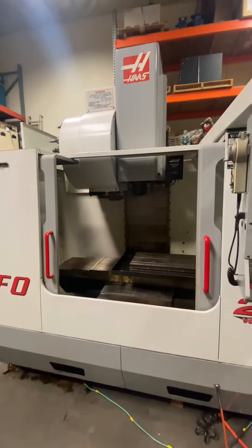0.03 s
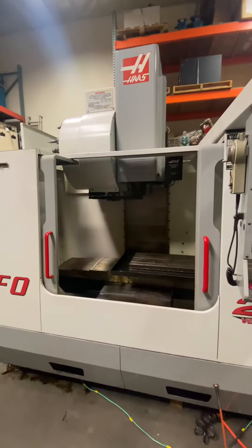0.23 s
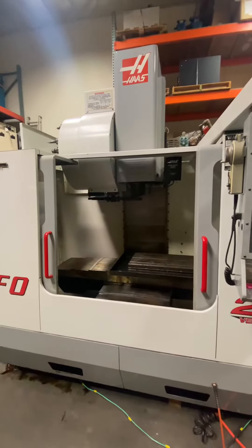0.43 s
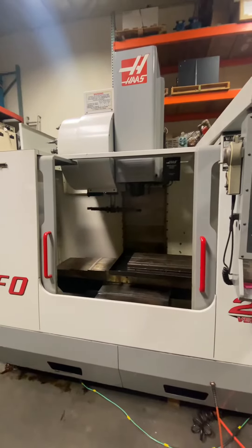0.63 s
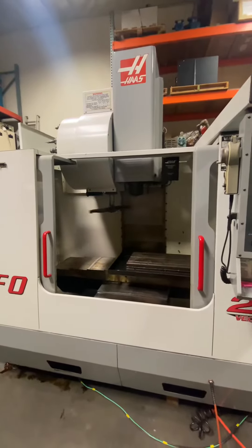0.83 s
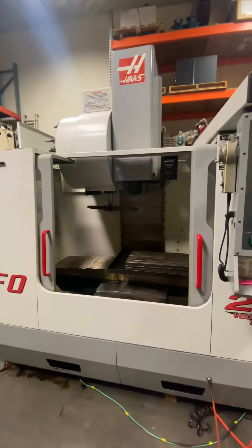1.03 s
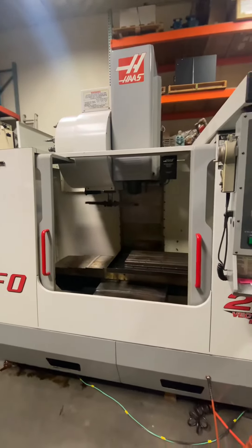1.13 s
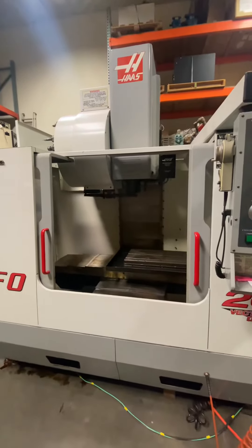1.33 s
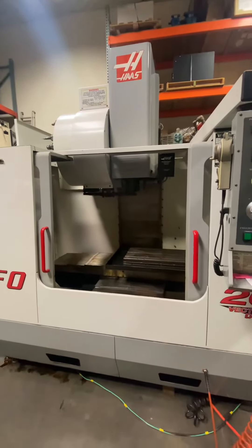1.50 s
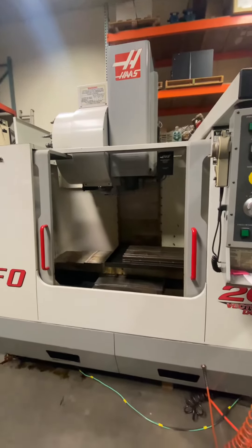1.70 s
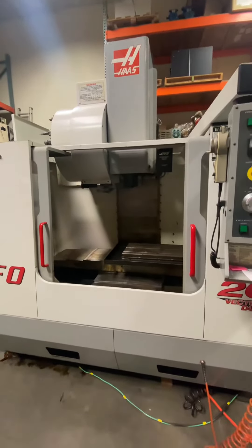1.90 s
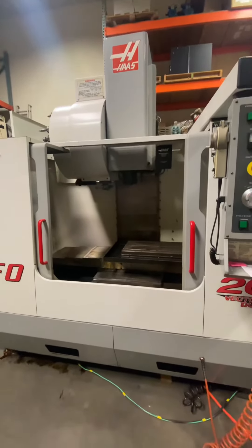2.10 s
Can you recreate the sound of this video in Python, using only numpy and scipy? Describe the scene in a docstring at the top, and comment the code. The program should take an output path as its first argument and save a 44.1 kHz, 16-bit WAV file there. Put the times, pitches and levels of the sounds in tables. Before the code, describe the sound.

Machine tool change: a thud, a second of hissing air, then another thud over low hum.

```python
"""A machine changes its tool

A machining centre in a warehouse is heard a few metres off through the open door. The drawbar, the rod
that grips the tool, lets go with a deep thud in the sheet-metal enclosure. A blast of air cleans the
tool's socket, the drawbar clamps with a duller thud, and the changer arm bumps and clacks home.
Motor tones and a hum lie underneath, and a soft hiss rises at the end."""
import sys
import numpy as np
from scipy import signal
from scipy.fft import rfft, irfft, next_fast_len
from scipy.io import wavfile
from scipy.ndimage import uniform_filter1d, map_coordinates

SR = 44100
rng = np.random.default_rng(int(sys.argv[2]) if len(sys.argv) > 2 else 0)


def file_out(sig):
    """Save sig as 16-bit WAV at sys.argv[1]."""
    # one column per channel
    cols = np.atleast_2d(sig).T
    # limit, then scale
    lim = np.clip(cols, -1, 1)
    pcm = np.round(lim * 32767).astype(np.int16)
    wavfile.write(sys.argv[1], SR, pcm)


N = 94815

# "Mid" is the sound that left and right share, and "side" is how they differ.
# A ring time is how long a sound takes to fade by 60 dB.
# How loud the air blast is. Each row: time in seconds, level in dB.
BLAST_LEVEL = [(.298, -68), (.312, -32), (.34, -27.5), (.39, -28), (.45, -23), (.56, -23), (.655, -24.5),
               (.83, -23), (1.05, -25.5), (1.25, -25.5), (1.36, -27), (1.405, -27.5), (1.44, -41),
               (1.5, -66.5), (1.6, -97)]
# The blast's tone as heard, mid and side, with deep gaps near 5 kHz and, in the mid, near 9 kHz.
# Each row: frequency in Hz, relative level in dB.
BLAST_HEARD_MID = [(500, -22.5), (900, -22), (1100, -4.5), (1500, -12.5), (2000, -9.5), (2350, -6.5),
                   (2500, -9), (2800, -4), (3000, -7.5), (3350, -2.5), (3530, -5), (3680, -0.5), (4000, -6),
                   (4250, -12.5), (4600, -18.5), (5000, -48), (5600, -19), (6200, -13), (8100, -14),
                   (8700, -76), (10000, -53), (13000, -31.5), (14500, -11.5), (15600, -40.5)]
BLAST_HEARD_SIDE = [(500, -44.5), (850, -31), (1060, -7), (1450, -22.5), (1970, -28), (2450, -5.5),
                    (3800, -12), (4500, -13.5), (5430, -48), (6100, -18), (8000, -15), (10300, -15),
                    (10800, -8.5), (11700, -18), (13700, -34.5), (15000, -20.5), (15600, -28.5)]
# Narrow resonances of the enclosure, which shift as the tool leaves.
# Each row: frequency in Hz, width in Hz, early boost in dB, late boost in dB.
RESONANCES = [(2116, 26, 6, 11.5), (2205, 24, 2.5, 6), (2330, 42, 13.5, 7), (2392, 30, 10.5, 9.5),
              (2563, 23, 10, 8.5), (2646, 18, -1.5, 11), (2751, 25, 3.5, 11.5), (2849, 60, 8.5, 9.5),
              (3246, 32, 4, 12), (3378, 59, 12, 10.5), (3615, 30, 5, 14), (3690, 30, 13, 4.5),
              (3736, 44, 7.5, 6), (4060, 30, 7.5, 8), (4280, 16, 6, 10.5), (4500, 24, 8, 8)]
# How long the hall echoes the jet. Each row: frequency in Hz, ring time in seconds.
ECHO_RING_TIMES = [(800, 0.88), (3000, 1.06), (6000, 1.05), (12000, 0.63)]
# The tone of that echo. Each row: frequency in Hz, gain in dB.
ECHO_TONE = [(900, -1), (2000, 1), (3700, -3.5), (5000, 3), (7000, -3), (12000, -5.5)]
# Drawbar thuds and arm bumps. Each row: start in seconds, gain in dB, favoured frequency in Hz,
# drop away from it in dB per octave squared (sign ignored), a factor on the ring times.
BLOWS = [(0.204, -15, 916, -2.5, 0.27), (.208, -10, 400, 0.5, 0.92), (0.386, -11, 77, 12, 0.29),
         (0.644, -27, 80, 1, 0.49), (.72, -30, 84, -0.5, 0.28), (1.091, -23, 150, 29, 0.35),
         (1.378, -11.5, 186, 13.5, 0.22), (1.403, -6, 272, 63, 0.28), (1.452, -22.5, 111, 8, 1),
         (1.53, -11.5, 79, 11.5, 0.16), (1.57, -24.5, 108.5, 2.5, 0.42), (1.66, -24.5, 81, 10.5, 0.38),
         (1.727, -27.5, 80, 5, 0.36), (1.869, -26.5, 96, 3.5, 0.39), (2.06, -26.5, 83.4, 10.5, 0.28)]
# The notes of the cast frame and the sheet metal.
# Each row: frequency in Hz, relative level in dB, ring time in seconds before a blow's factor.
BODY_NOTES = [(73.9, -2.5, 3.26), (117.8, 6.5, 0.51), (148.6, 3.5, 0.87), (194.3, -6.5, 1.28),
              (286.3, -6.5, 0.73), (307.2, -9.5, .6), (355.4, -7, 0.77), (387, -0.5, 0.91),
              (426, 0.5, 0.98), (486, -11, 0.44), (619, -10.5, .6), (674, -8, .3), (805, -16.5, 0.37),
              (1069, -10, 1.25), (1134, -6, 0.14), (1254, -19.5, .5), (1570, -15.5, 0.18), (1716, -2, 0.16),
              (1780, -4, 0.23)]
# The tone of the rattling panels. Each row: frequency in Hz, relative level in dB.
RATTLE_TONE = [(40, -32), (120, -5), (170, -10.5), (240, -23.5), (400, -7.5), (620, -20.5), (900, -33),
               (1090, -14), (1400, -29.5), (1780, -18.5), (2200, -39.5), (8000, -60.5), (15000, -60.5)]
# How long they rattle. Each row: frequency in Hz, ring time in seconds before a blow's factor.
RATTLE_RING_TIMES = [(70, 1.6), (400, 1.19), (2000, 1.25), (10000, 0.93)]
# The tone of the arm's clack. Each row: frequency in Hz, relative level in dB.
CLACK_TONE = [(700, -26.5), (1000, -9), (1350, -1), (1700, -6.5), (2300, -1), (2600, -6), (2950, 1.5),
              (3300, -6), (3600, -17.5), (6000, -15), (9000, -46), (15000, -44)]
# How wide the knocks and motors sound. Each row: frequency in Hz, gain of the side in dB.
STEREO_WIDTH = [(60, -43), (110, -49.5), (200, -35.5), (380, -6.5), (700, -6), (1200, 2), (1800, -8),
                (2700, 5.5), (4200, 3.5), (8000, -10), (10000, 23), (15000, 16)]
# Motor tones. Each row: start and end in seconds, first and last pitch in Hz, level in dB.
MOTOR_RUNS = [(-.2, .24, 324, 322, -37), (.45, .66, 730, 762, -41), (.85, 1.03, 757, 757, -36),
              (1.05, 1.36, 302, 302, -48), (1.62, 1.97, 735, 800, -50)]
# The hum as heard, mid and side. Each row: frequency in Hz, relative level in dB.
HUM_HEARD_MID = [(18, -60.5), (30, 5.5), (150, -3.5), (264, -11), (319, -6.5), (403, -19), (764, -11.5),
                 (1090, -26.5), (1630, -27.5), (8500, -43.5), (11000, -140), (18700, -120)]
HUM_HEARD_SIDE = [(59, -89.5), (100, -59.5), (196, -21.5), (780, -5.5), (1140, -22), (4640, -24),
                  (5040, -24), (8340, -32), (15000, -59.5)]
# How the hum and the closing hiss swell. Each row: time in seconds, relative level in dB.
HUM_LEVEL = [(0.0, -38.5), (0.18, -33.5), (0.3, -37), (1.21, -44), (2.15, -43.5)]
HISS_LEVEL = [(1.86, -81), (1.92, -49.5), (2.15, -42.5)]
# The hiss as heard, mid and side, with the mid nearly silent from 8 to 12 kHz.
# Each row: frequency in Hz, relative level in dB.
HISS_HEARD_MID = [(900, -16.5), (1500, -3.5), (3000, -2), (5900, -7), (7600, -10), (8400, -59),
                  (11900, -44.5), (13700, -10.5), (15500, -41.5)]
HISS_HEARD_SIDE = [(900, -31), (1500, -8), (3100, 0.5), (4600, -3), (9900, -12.5), (14300, -14),
                   (15500, -61)]
# The stereo balance. Each row: frequency in Hz, gain of left over right in dB.
BALANCE = [(60, -0.5), (150, 0.77), (250, 2.5), (700, 0.2), (1300, -1), (4000, -1.95), (9000, 0)]
# An even tone. Its one row: frequency in Hz, level in dB.
FLAT = [(1, 0)]


def air_blast():
    """A jet of swirling air stirs the enclosure's resonances and echoes round the hall."""
    shift_middle_s, shift_length_s = .69, .3
    side_lead_radians, echo_db, echo_boost_share = 1.78, -5, .85
    jet = rushing_noise(FLAT, FLAT, side_db=0, patchy_db=1.5)[0]
    flutter_db = .6 * wobble(6.86)
    jet *= amp(level_curve(BLAST_LEVEL) + flutter_db)
    tail = fading_noise(FLAT, lambda hz: look_up(ECHO_RING_TIMES, hz))
    tail = np.pad(tail / np.linalg.norm(tail[0]), ((0, 0), (SR // 50, 0)))  # arrives 20 ms later
    late = np.clip((np.arange(N) / SR - shift_middle_s) / shift_length_s + .5, 0, 1)
    lead = [1, np.exp(1j * side_lead_radians)]
    echo_gain = lambda hz: amp(echo_db + look_up(ECHO_TONE, hz))
    air = np.zeros((2, N))
    for stage, share in enumerate([1 - late, late]):  # the early boosts fade into the late ones
        air += filtered(share * jet, lambda hz: np.outer(lead, enclosure_boost(hz, stage)))
        echo = signal.fftconvolve(share * jet[None], tail, axes=1)[:, :N]
        air += filtered(echo, lambda hz: echo_gain(hz) * enclosure_boost(hz, stage) ** echo_boost_share)
    heard = lambda hz: amp([look_up(BLAST_HEARD_MID, hz), look_up(BLAST_HEARD_SIDE, hz)])
    mid, side = filtered(air, heard)
    return np.std(jet) * np.array([normalised(mid), amp(3.5) * normalised(side)])


def enclosure_boost(hz, stage):
    """The enclosure strengthens sound near its resonances; stage 0 is early and 1 is late."""
    return amp(sum(boosts_db[stage] / (1 + (2 * (hz - centre_hz) / width_hz) ** 2)
                   for centre_hz, width_hz, *boosts_db in RESONANCES))


def thuds():
    """Each blow of the drawbar or arm rings the machine's body and rattles its panels."""
    rise_s, rattle_db = .003, -9
    out, t = np.zeros((2, N + SR)), np.arange(SR) / SR
    for start_s, gain_db, favoured_hz, drop_db, ring_factor in BLOWS:
        tone_db = lambda hz: -abs(drop_db) * np.log2((hz + 1) / favoured_hz) ** 2
        ring = np.zeros((2, SR))
        for note_hz, note_db, ring_s in BODY_NOTES:
            phase = wandering_phase(t)
            start_db = note_db + tone_db(note_hz) + rng.normal(0, 1)
            fade_db = 60 * t / (ring_s * ring_factor)
            ring += amp(start_db - fade_db) * np.sin(2 * np.pi * note_hz * t + phase)
        rattle = fading_noise(RATTLE_TONE, lambda hz: ring_factor * look_up(RATTLE_RING_TIMES, hz))
        rattle = filtered(rattle, lambda hz: amp(rattle_db + tone_db(hz)))[:, :SR]
        rise = 1 - np.exp(-t / rise_s)
        out[:, round(start_s * SR):][:, :SR] += amp(gain_db) * (ring / 2 + rattle) * rise
    return spread(out[:, :N])


def arm_clack():
    """The arm lands home with a bright knock that dies away in the hall."""
    start_s, level_db, rise_s, ring_s = 1.887, -34.5, .0007, .39
    out, t = np.zeros((2, N + SR)), np.arange(SR) / SR
    knock = fading_noise(CLACK_TONE, lambda hz: np.full_like(hz, ring_s))
    rise = 1 - np.exp(-t / rise_s)
    out[:, round(start_s * SR):][:, :SR] = amp(level_db) * knock * rise
    return spread(out[:, :N])


def motors():
    """The motors sing slightly unsteady tones that swell and fade."""
    waver_hz, waver_db = 3, 1.5
    out, t = np.zeros((2, N)), np.arange(N) / SR
    for start_s, end_s, first_hz, last_hz, level_db in MOTOR_RUNS:
        progress = np.clip((t - start_s) / (end_s - start_s), 0, 1)
        pitch_hz = first_hz + (last_hz - first_hz) * progress + waver_hz * wobble(17)
        phase = 2 * np.pi * np.cumsum(pitch_hz) / SR
        swell = np.clip(2 * np.sin(np.pi * progress), 0, 1)
        peak = np.sqrt(2) * amp(level_db + waver_db * wobble(25.14))
        out += peak * swell * [np.sin(phase), np.cos(phase)]
    return spread(out)


def warehouse_hum():
    """Machines fill the warehouse with a low, rushing hum."""
    lift_db = 8
    hum = rushing_noise(HUM_HEARD_MID, HUM_HEARD_SIDE, side_db=-10, patchy_db=2.5)
    return amp(level_curve(HUM_LEVEL) + lift_db) * hum


def closing_hiss():
    """A soft hiss rises at the end."""
    hiss = rushing_noise(HISS_HEARD_MID, HISS_HEARD_SIDE, side_db=4, patchy_db=1)
    return amp(level_curve(HISS_LEVEL)) * hiss


def rushing_noise(mid_tone, side_tone, side_db, patchy_db):
    """Mid and side noise with small louder and softer patches across time and pitch."""
    bands = signal.stft(rng.standard_normal((2, N + 512)), nperseg=512)[2]
    patches = uniform_filter1d(rng.standard_normal(bands.shape), size=6, axis=1)
    patches = uniform_filter1d(patches, size=8, axis=2)
    noise = signal.istft(bands * amp(patchy_db * normalised(patches)), nperseg=512)[1][:, :N]
    mid, side = filtered(noise, lambda hz: amp([look_up(mid_tone, hz), look_up(side_tone, hz)]))
    return np.array([normalised(mid), amp(side_db) * normalised(side)])


def fading_noise(tone, ring_time):
    """One second of mid and side noise, each band fading over its own ring time."""
    hz, t, bands = signal.stft(rng.standard_normal((2, SR)), SR, nperseg=1024)
    level_db = look_up(tone, hz)[:, None] - 60 * t / ring_time(hz)[:, None]
    noise = signal.istft(bands * amp(level_db), SR, nperseg=1024)[1][:, :SR]
    return noise / np.sqrt(np.mean(noise[:, :SR // 50] ** 2))  # the first 20 ms set the level


def wandering_phase(t, blur=1.05):
    """A random drift in radians, for mid and side, that blurs a note's pitch."""
    walks = np.cumsum(rng.standard_normal((2, 64)), axis=1) * blur / np.sqrt(2 * np.pi)
    drift = np.array([np.interp(t, np.arange(64) / 63, walk) for walk in walks])
    return drift + rng.uniform(0, 1, (2, 1)) * [[1], [2 * np.pi]]


def spread(pair):
    """Keep the bass in the centre and let the treble sound wide."""
    return filtered(pair, lambda hz: [np.ones_like(hz), amp(look_up(STEREO_WIDTH, hz))])


def filtered(x, response):
    """Change a sound's tone: response gives the gain at each frequency."""
    size = next_fast_len(N + SR // 2)
    return irfft(rfft(x, size) * response(np.fft.rfftfreq(size, 1 / SR)), size)[..., :N]


def wobble(rate):
    """A smooth curve through random values, rate of them each second."""
    values = rng.standard_normal(int(N * rate / SR) + 4)
    return map_coordinates(values, [np.arange(N) * rate / SR])


def level_curve(rows):
    """Join the rows into a level in dB for every sample, silent before the first row."""
    times, levels = np.transpose(rows)
    return np.interp(np.arange(N) / SR, times, levels, left=-120)


def look_up(rows, hz):
    """Read between a table's rows, with frequencies spaced by octaves."""
    frequencies, values = np.transpose(rows)
    return np.interp(np.log(hz + 1), np.log(frequencies + 1), values)


def normalised(x):
    """Scale a signal to an average (RMS) level of 1."""
    return x / np.sqrt(np.mean(x ** 2) + 1e-20)


def amp(db):
    """Turn decibels into a factor to multiply by."""
    return 10 ** (np.asarray(db) / 20)


def scene():
    """Add up the sources and turn mid and side into left and right."""
    mid, side = air_blast() + thuds() + arm_clack() + motors() + warehouse_hum() + closing_hiss()
    return np.array([mid + side, mid - side])


def record(dry):
    """Tip each band a little left or right, and cut the deepest bass and the highest treble."""
    low_cut_hz, top_hz = 52, 15700
    balance = lambda hz: amp(np.outer([.5, -.5], look_up(BALANCE, hz)))
    bass_cut = lambda hz: (1j * hz / (low_cut_hz + 1j * hz)) ** 3
    return filtered(dry, lambda hz: balance(hz) * bass_cut(hz) * (hz < top_hz))


dry = scene()
out = record(dry)
file_out(out)
```